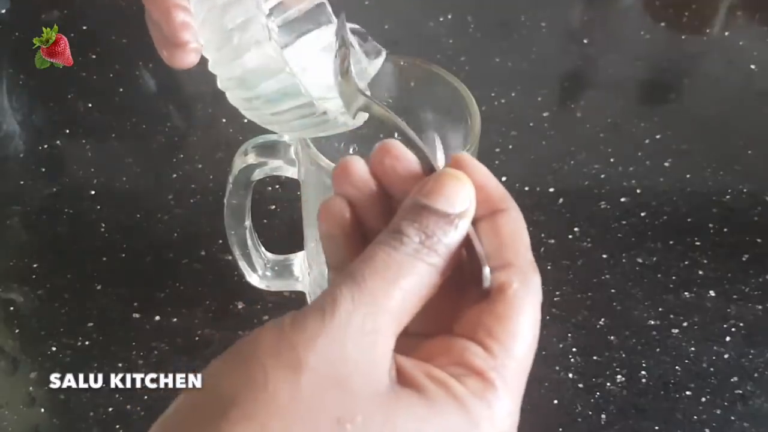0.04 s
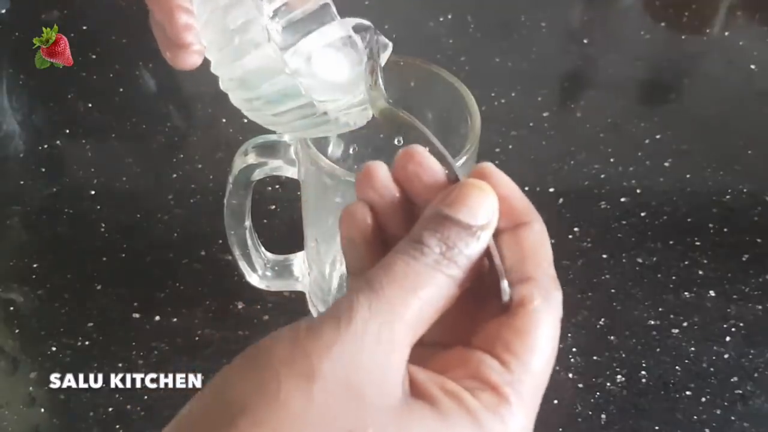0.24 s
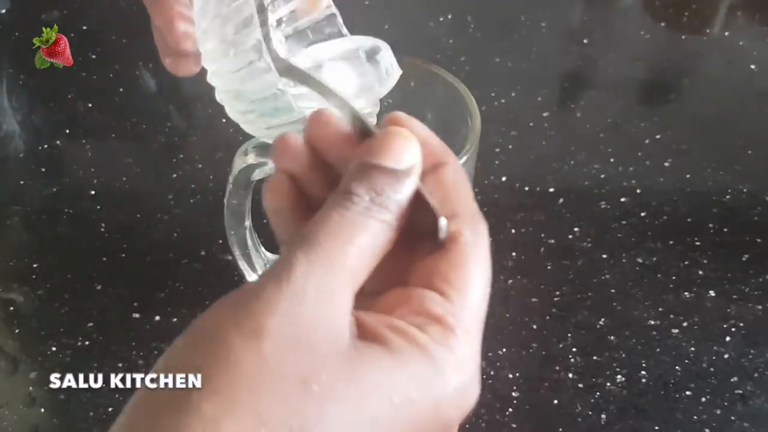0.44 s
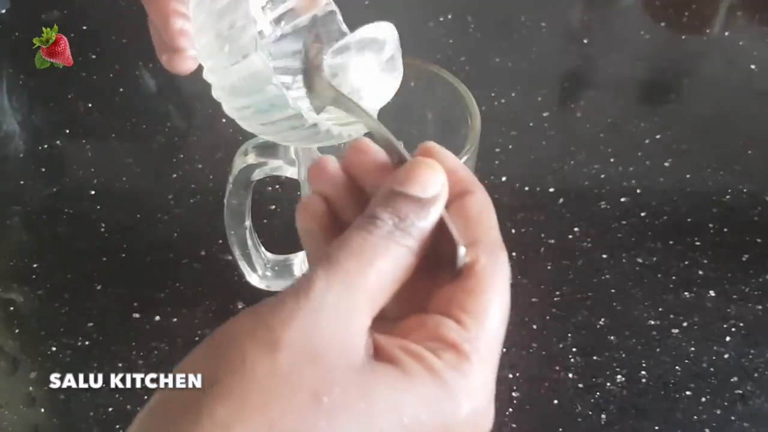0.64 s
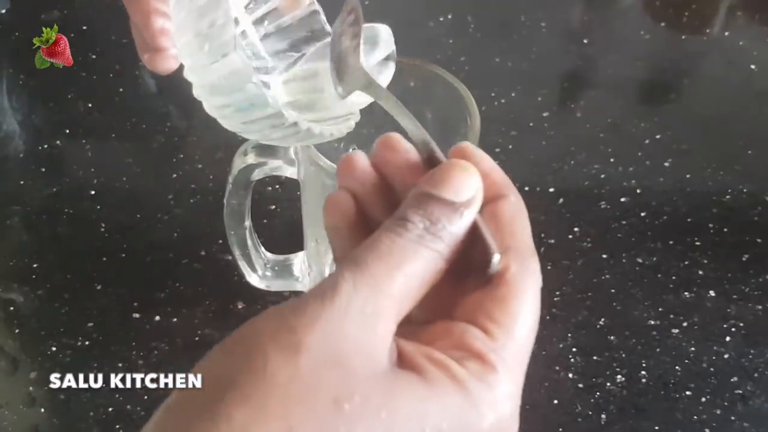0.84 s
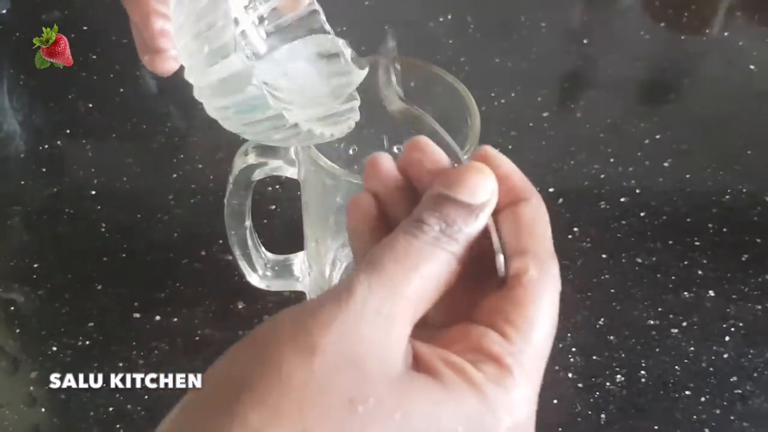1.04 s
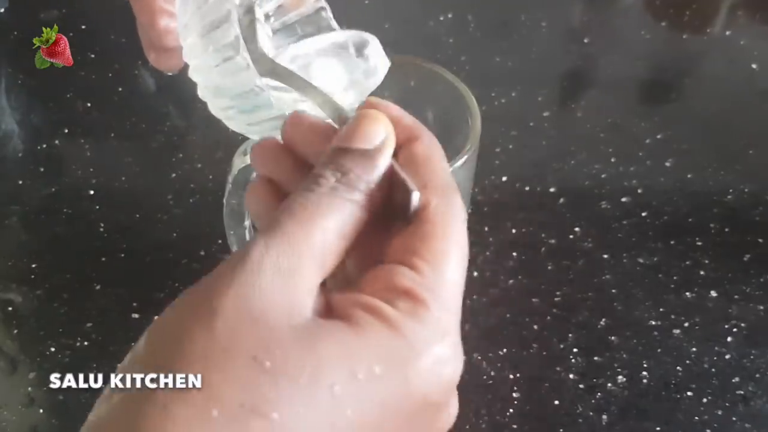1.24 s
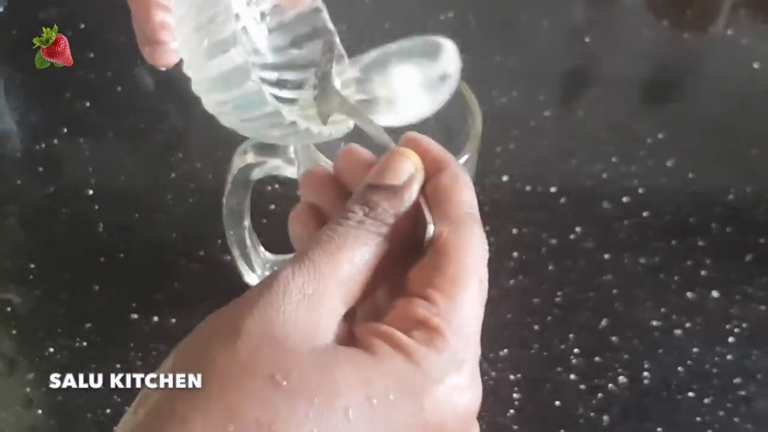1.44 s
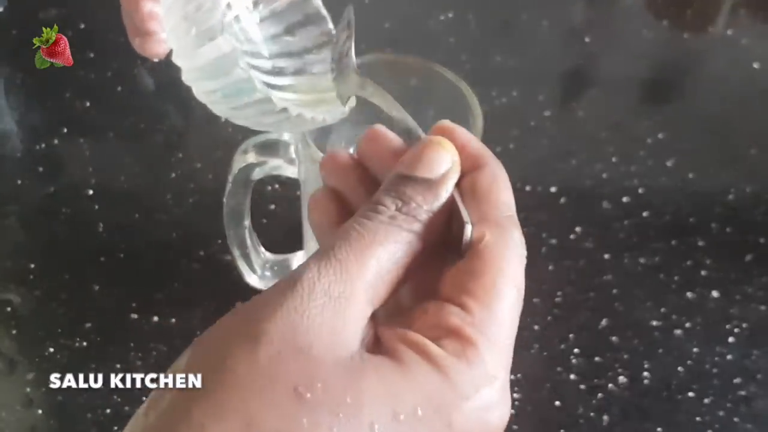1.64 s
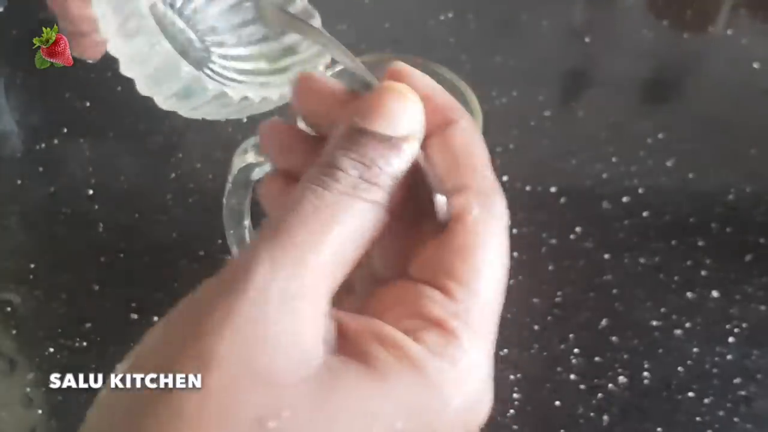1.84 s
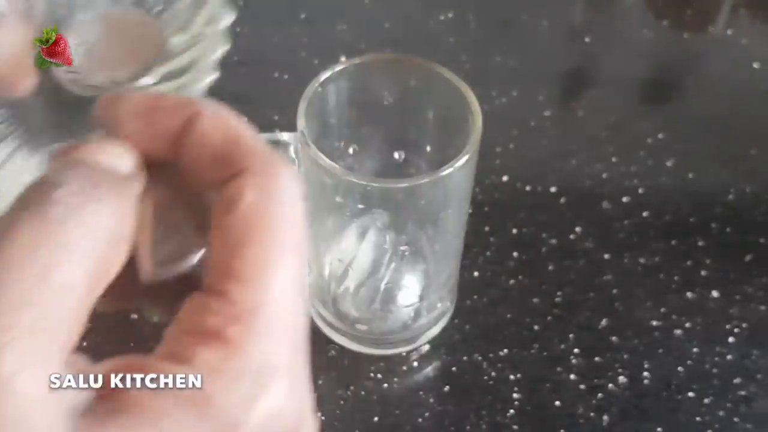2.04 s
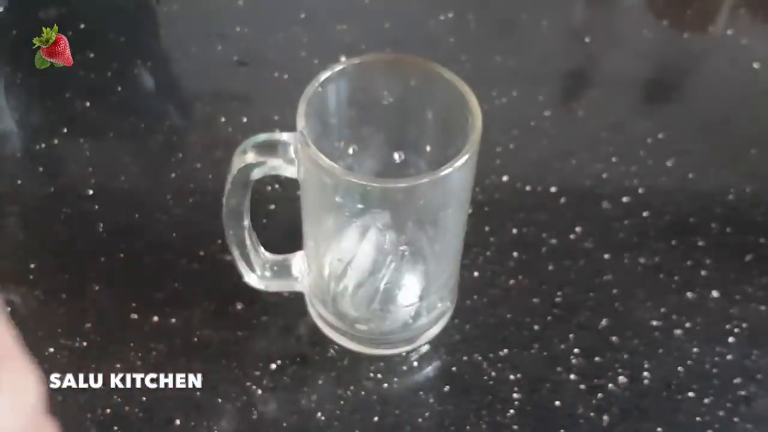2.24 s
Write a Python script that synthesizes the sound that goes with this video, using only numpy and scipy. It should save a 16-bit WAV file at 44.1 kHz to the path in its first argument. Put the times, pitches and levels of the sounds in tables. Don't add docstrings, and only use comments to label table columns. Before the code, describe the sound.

Ice cubes drop and ring against a glass mug, then a metal spoon taps a bowl

```python
import sys
import numpy as np
from scipy import signal
from scipy.fft import rfft, irfft, next_fast_len
from scipy.io import wavfile

SR = 44100
rng = np.random.default_rng(int(sys.argv[2]) if len(sys.argv) > 2 else 0)


def inscribe(sig):
    pcm = np.round(np.clip(np.atleast_2d(sig).T, -1, 1) * 32767)
    wavfile.write(sys.argv[1], SR, pcm.astype(np.int16))


def how_loud(loudness_db):
    steps = np.asarray(loudness_db, float) / 20
    return 10 ** steps


N = 101871


def along(points, hz):
    f, v = np.transpose(points)
    return np.interp(np.log(hz + 1), np.log(f + 1), v)


def filtered(x, response):
    m = next_fast_len(x.shape[-1] + 8192)
    spectrum = rfft(x, m) * response(np.fft.rfftfreq(m, 1 / SR))
    return irfft(spectrum, m)[..., :x.shape[-1]]


def add(out, x, s):
    i = max(round(s * SR), 0)
    out[..., i:i + x.shape[-1]] += x[..., :N - i]


def peak(f, hz, width_hz):
    return 1j * f * width_hz / (hz * hz - f * f + 1j * f * width_hz)


def low_cut(f):
    corner_hz = 222
    return (1j * f / (corner_hz + 1j * f)) ** 4


# (frequency [Hz], t60 [s])
ROOM_T60 = [(300, 0.72), (1000, 0.53), (3000, 0.4), (8000, 0.46), (15000, 0.3)]


def tail():
    mono_below_hz, build_up_s = 500, 0.016
    hz, t, z = signal.stft(rng.standard_normal((2, 2 * SR // 5)), SR, nperseg=256)
    mid, side = z[0], z[1] * (hz / (hz + mono_below_hz))[:, None]
    decay = how_loud(-60 * t / np.maximum(along(ROOM_T60, hz), .05)[:, None])
    x = signal.istft(np.array([mid + side, mid - side]) * decay, SR, nperseg=256)[1]
    x = x * (1 - np.exp(-np.arange(x.shape[1]) / SR / build_up_s))
    return x / np.linalg.norm(x[0])


def placed(out, x, s, wet_db):
    add(out, x, s)
    add(out, how_loud(wet_db) * signal.fftconvolve(x.mean(0)[None], tail(), axes=1), s)


def strikes(hits, modes_hz, modes, pan_db, level_db, tilt_db, clatter_t60=0.15, damped_s=9, fuzz=.55):
    scatter_db, fuzz_per_s, landing_loss_db = 1.5, 130, 6
    attack_s, crack_t60, clatter_db, cluster_hz, wet_db = 0.00099, 0.0093, 11, 250, -9
    out, t = np.zeros((2, N)), np.arange(2 * SR // 5) / SR
    hz = np.array(modes_hz)[:, None]
    db, t60 = np.array(modes).T[:, :, None]
    turn = 1.845 * np.sin(hz) * [[[.5]], [[-.5]]]

    def clusters(f):
        return (how_loud(1.07 * db) * peak(f, hz, cluster_hz + hz / 25) ** 2).sum(0)

    def tilt(f):
        return how_loud(tilt_db * np.log2((f + 300) / 5000))

    for s, peak_db, crack_db in hits:
        luck = rng.standard_normal((len(hz), 2))
        knots = rng.standard_normal((len(hz), 2, 60))
        wander = [[np.interp(t * fuzz_per_s, np.arange(60), k) for k in pair] for pair in knots]
        drift = fuzz * np.array(wander)
        gain = how_loud(db + scatter_db * luck[:, :1] - 60 * t / np.maximum(t60, .01))
        gain = gain * (1 + .5 * drift[:, 0])
        landed = (s < damped_s) * (t > damped_s - s)
        gain = gain * how_loud(-landing_loss_db * landed + tilt_db * np.log2(hz / 5000))
        phase = 2 * np.pi * hz * t + drift[:, 1] + turn + 2 * luck[:, 1:]
        ring = (gain * np.sin(phase)).sum(1) * (1 - np.exp(-t / attack_s))
        noise = rng.standard_normal((2, len(t)))
        clatter = filtered(how_loud(clatter_db - 60 * t / clatter_t60) * noise, clusters)
        crack = how_loud(crack_db) * (how_loud(-60 * t / crack_t60) * noise + clatter)
        sound = filtered(ring + filtered(crack, tilt), low_cut)
        sound = sound * how_loud([[pan_db / 2], [-pan_db / 2]])
        placed(out, how_loud(peak_db + level_db) * sound, s, wet_db)
    return out


def earlier():
    out, t = np.zeros((2, N)), np.arange(SR // 2) / SR
    thud_db, thud_t60, tail_db = -29.5, 0.17, -28
    tones = np.sin(2 * np.pi * 339 * t) + .5 * np.sin(2 * np.pi * 282 * t)
    thud = how_loud(thud_db - 60 * t / thud_t60) * tones
    placed(out, thud * how_loud([[2], [-2]]), 0, -9.0)
    dull = filtered(tail()[:, 600:], lambda f: 1 / (1 + (f / 2500) ** 2) * low_cut(3 * f))
    add(out, how_loud(tail_db) * dull / np.abs(dull).max(), 0)
    return out


# (frequency [Hz], density [dB per Hz])
AIR_SPECTRUM = [(200, -14), (900, -13), (2300, -13), (5000, -18), (15000, -24)]
HUM_SPECTRUM = [(25, -32), (100, -8), (200, -18.5), (700, -17.5)]
# (time [s], level [dB])
GATE = [(0, -58.5), (0.448, -68.5), (.8, -79), (1.12, -87), (1.3, -78.5), (1.5, -62.5), (2.31, -66)]


def hush():
    air_db, side_db = -65.5, -7.5
    air = filtered(rng.standard_normal((2, N)), lambda f: how_loud(along(AIR_SPECTRUM, f)))
    hum = filtered(rng.standard_normal((2, N)), lambda f: how_loud(along(HUM_SPECTRUM, f)) * (f < 900))
    gate = how_loud(np.interp(np.arange(N) / SR, *np.transpose(GATE)))
    air = how_loud(air_db) * (gate / gate.max()) ** 0.25 / air[0].std() * air
    mid, side = air + gate / hum[0].std() * hum
    return np.array([mid + how_loud(side_db) * side, mid - how_loud(side_db) * side])


# (time [s], level [dB], crack [dB])
FIRST_TAP = [
    (.0139, -22, -1.5),
]
RIM_HITS = [
    (.0684, -1, 1),
    (.131, -14, 8),
    (.2165, -28.5, 13.5),
]
RIM_BRUSHES = [
    (.296, -30, -22),
    (.84, -47.5, -19.5),
]
# (level [dB], t60 [s])
RIM_HZ = [2655, 2628, 2785, 3896, 5490, 6611, 7220, 8614, 10020, 10603, 13895, 14620]
RIM_MODES = [(-14, 0.038), (-8.5, 0.85), (-7.5, 0.03), (-11, 0.27), (-5.5, 0.46), (-11.5, 0.39),
             (-13.5, 0.29), (-14.5, 0.17), (-18, 0.13), (-12.5, 0.087), (-22, .4), (-18.5, .45)]


def mug_rim():
    out = strikes(RIM_HITS, RIM_HZ, RIM_MODES, 6.3, -7, -0.72, damped_s=.123, fuzz=0.23)
    out = out + strikes(FIRST_TAP, RIM_HZ, RIM_MODES, 1.5, -7.0, 9.9)
    return out + strikes(RIM_BRUSHES, RIM_HZ, RIM_MODES, 1.1, -7.5, -3.5, fuzz=0.22)


# (time [s], level [dB], centre [Hz],
# rattle [dB])
ICE_KNOCKS = [(0.019, -25.5, 910, 0.5), (0.1228, 2.5, 2690, -10), (.129, -3.5, 3280, -10),
              (0.134, -6, 3750, -7.5), (.143, -13, 1080, -9.5), (.19, -20, 3500, -13),
              (.207, -11, 3760, -11.5), (0.2145, -12, 5600, -6), (.219, -10.5, 3320, -7),
              (0.235, -24, 4000, -13), (.424, -33, 1233, -4), (0.478, -28, 2500, -4.5),
              (.4785, -12, 8760, -9.5), (.512, -26.5, 1746, -4), (0.8124, -35, 1028, -1.5),
              (.832, -36.5, 929, -4), (0.896, -39, 950, -6), (.914, -39.5, 1035, -3),
              (.948, -39.5, 950, -3), (1.166, -33, 1970, -3.5), (1.19, -37, 1700, -16),
              (1.25, -38, 1410, 21), (1.259, -28, 11020, -1), (1.289, -26.5, 1870, -3),
              (1.302, -29.5, 10830, 0.5), (1.511, -16.5, 1230, -5), (1.555, -37, 880, 1.5),
              (1.594, -29, 650, -8), (1.608, -31.5, 710, -9), (1.661, -14, 1220, -3),
              (1.6668, -12, 3430, 2), (1.674, -5.5, 3800, -27.5), (1.6966, -2.5, 3320, -10),
              (1.701, -9.5, 4040, -17.5), (1.737, -6.5, 2520, -13), (1.744, -19, 2600, 0.5),
              (2.017, -16, 2900, -3.5), (2.046, -33, 1400, -7), (2.063, -39, 412, -3),
              (2.1614, -15.5, 4570, 0.5), (2.1928, -21, 3240, -4.5)]


def ice():
    knock_t60, rattle_t60, chips_per_s, wet_db = 0.018, 0.14, 6000, -3.5
    mug_air_hz, mug_air_width_hz, mug_air_db = 950, 500, -12
    out, t = np.zeros((2, N)), np.arange(SR // 6) / SR
    for s, db, hz, rattle_db in ICE_KNOCKS:
        luck, size = rng.random((2, len(t))), rng.standard_normal((2, len(t)))
        chips = (luck[0] < chips_per_s / SR) * size * how_loud(min(rattle_db, 0) - 60 * t / rattle_t60)
        blow = (t == 0) * 2 + (luck[1] - .5) * how_loud(2.5 - 60 * t / knock_t60)

        def body(f):
            cube = peak(f, hz, 1.3 * hz) ** 2
            mug_air = how_loud(mug_air_db) * peak(f, mug_air_hz, mug_air_width_hz) ** 2
            return low_cut(f) / (1 + 1j * f / (2 * hz)) * (cube + mug_air)

        blow, left, right = filtered(np.array([blow, *chips]), body)
        knock = np.array([(blow + left) * how_loud(-0.5), (np.roll(blow, 2) + right) * how_loud(-2.0)])
        placed(out, how_loud(db) * knock / np.abs(blow).max(), s, wet_db)
    return out


# (time [s], level [dB], crack [dB])
SPOON_HITS = [
    (.4775, -40, 15.5),
    (1.166, -46, 3.5),
    (1.258, -41, 12.5),
    (2.0165, -3, -0.5),
    (2.0418, -18.5, 4),
]
# (level [dB], t60 [s])
SPOON_HZ = [4221, 4312, 6158, 7714, 8300, 9260, 9800, 10650, 11600, 12260, 12605, 13243, 15400]
SPOON_MODES = [(-0.5, 0.054), (-15, 0.19), (-5, 0.11), (-8, 0.024), (-13.5, 0.044), (-18, 0.14),
               (1.5, 0.0584), (-9, 0.022), (-13.5, 0.18), (-1.5, 0.16), (-12.5, 0.043), (-4, 0.092),
               (-12, 0.058)]


def spoon():
    return strikes(SPOON_HITS, SPOON_HZ, SPOON_MODES, 7.9, -13.5, 1.0, clatter_t60=0.17)


# (time [s], level [dB], crack [dB])
BOWL_NUDGES = [(.6294, -46, -13), (.6629, -38.5, 4), (.812, -31.5, -12), (.83, -36.5, -17), (.8965, -36, 5),
               (.9124, -40.5, -23), (.9482, -36, 3), (1.1293, -51.5, -10), (1.289, -35.5, 9),
               (1.3649, -36, 0), (1.3857, -30.5, -1), (1.4052, -23, -18), (1.4194, -30, 3)]
# (level [dB], t60 [s])
BOWL_HZ = [2120, 2186, 2245, 2317, 4242, 4610, 6500, 7214, 10640, 12250, 15000]
BOWL_MODES = [(-24.5, 0.3), (-1, 0.15), (-12, 0.35), (-6.5, 0.051), (1, 0.032), (-2.5, 0.14), (-21, 0.028),
              (-2.5, 0.049), (-24, 0.23), (-42, 0.14), (-25.5, 0.073)]


def bowl_nudged():
    return strikes(BOWL_NUDGES, BOWL_HZ, BOWL_MODES, -0.38, -15, -6.5, fuzz=1.0)


# (time [s], level [dB], crack [dB])
BOWL_HITS = [
    (1.4355, -6, -5.5),
    (1.4546, -23.5, -3.5),
]


def bowl_struck():
    return strikes(BOWL_HITS, BOWL_HZ, BOWL_MODES, -0.64, -7.0, 0.96)


# (time [s], level [dB], crack [dB])
RIM_TAPS = [
    (1.511, -13, 3),
    (1.5213, -20.5, 0.5),
]
# (level [dB], t60 [s])
BOTH_HZ = [7230, 2312, 2628, 3896, 4684, 5485, 6611, 7397, 10710, 9823, 11250, 12610, 14460, 15560]
BOTH_MODES = [(-10, 0.3), (2, 0.25), (-10, 0.47), (-14.5, 0.49), (-1.5, 0.043), (-15.5, 0.52),
              (-11.5, 0.53), (-14, 0.62), (-7.5, 0.089), (-3.5, 0.18), (-8, 0.059), (-5, 0.086),
              (-14, 0.17), (-12.5, 0.29)]


def bowl_on_rim():
    return strikes(RIM_TAPS, BOTH_HZ, BOTH_MODES, 2.7, -7.0, -0.44, fuzz=0.88)


# (time [s], level [dB], crack [dB])
FULL_MUG_HITS = [
    (1.674, -2.5, -3.5),
    (1.697, -16, -3),
]
SETTLING_HIT = [
    (1.737, -11.5, -8.5),
]
# (level [dB], t60 [s])
FULL_MUG_HZ = [2309, 2628, 2790, 2951, 3095, 4047, 4565, 5500, 6610, 7195, 8600, 10020, 10590, 14100]
FULL_MUG_MODES = [(-11.5, 0.32), (-9.5, 0.46), (-15.5, 0.15), (-2, 0.077), (-8.5, 0.16), (-11, 0.13),
                  (-16.5, 0.095), (-3, 0.093), (-6.5, 0.11), (-3.5, 0.32), (-22.5, 0.31), (-14, 0.39),
                  (-19.5, 0.25), (-10, 0.26)]


def full_mug():
    hits = strikes(FULL_MUG_HITS, FULL_MUG_HZ, FULL_MUG_MODES, 1.1, -11, -0.013, clatter_t60=0.23)
    return hits + strikes(SETTLING_HIT, FULL_MUG_HZ, FULL_MUG_MODES, 1.7, -8, -6.5)


# (time [s], level [dB], crack [dB])
LAST_HITS = [
    (2.161, -9.5, 0.24),
    (2.1934, -14.5, 4),
]
# (level [dB], t60 [s])
SPOON_BOWL_HZ = [2230, 4335, 4648, 6500, 7455, 8700, 10617, 12070, 12207, 13300, 14500, 15600]
SPOON_BOWL_MODES = [(-25.5, 0.62), (-11.5, 0.33), (-18, 0.16), (-4, 0.022), (-7, 0.083), (-13, 0.062),
                    (-11.5, 0.085), (-8.5, 0.058), (-15.5, .2), (-24, 0.099), (-12, 0.11), (-22.5, 0.21)]


def spoon_on_bowl():
    return strikes(LAST_HITS, SPOON_BOWL_HZ, SPOON_BOWL_MODES, 9.6, -9.5, 2.8, clatter_t60=0.12, fuzz=1.0)


def scene():
    mug = mug_rim() + full_mug()
    bowl = bowl_struck() + bowl_on_rim() + bowl_nudged()
    steel = spoon() + spoon_on_bowl()
    return mug + bowl + steel + ice() + earlier() + hush()


def low_pass(x):
    return signal.sosfilt(signal.butter(12, 16990, fs=SR, output="sos"), x)


def record(dry):
    ceiling, top_hz, leak_db = .92, 15850, -27.5
    limited = dry / (1 + np.abs(dry / ceiling) ** 6) ** (1 / 6)
    mix = dry + filtered(limited - dry, lambda hz: hz > 300)
    mix = filtered(mix, lambda hz: how_loud(leak_db) + 1 / (1 + (hz / top_hz) ** 150))
    return low_pass(mix)


dry = scene()
out = record(dry)
inscribe(out)
```